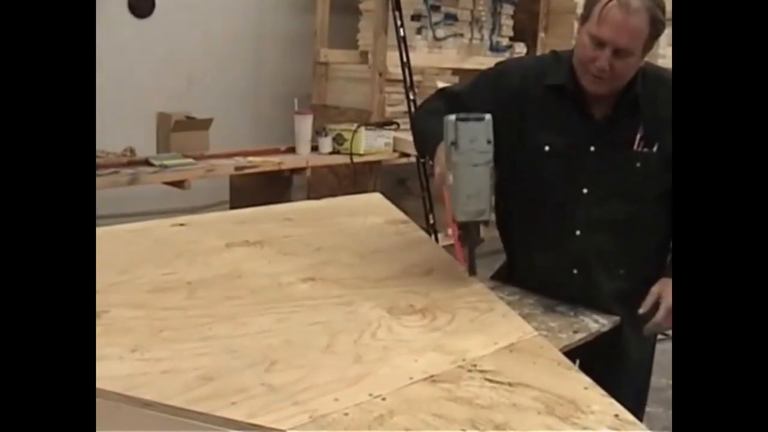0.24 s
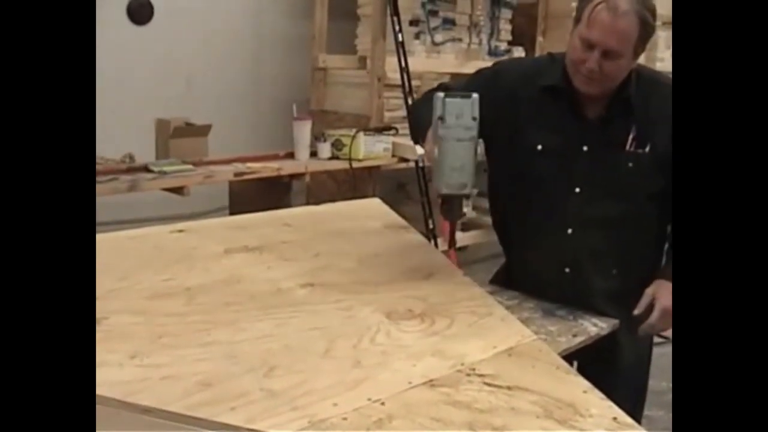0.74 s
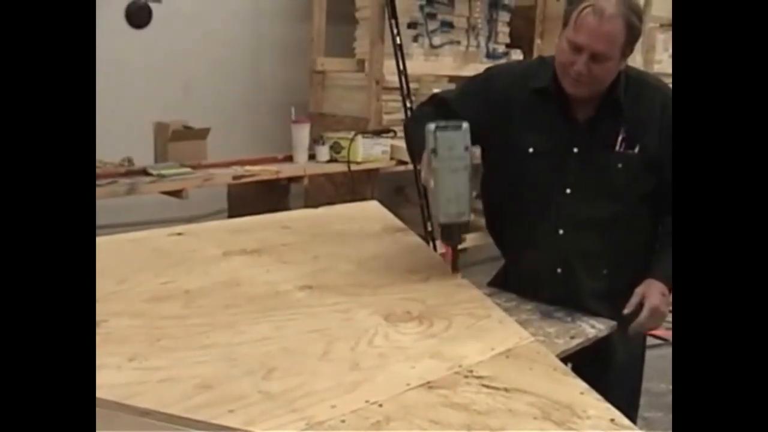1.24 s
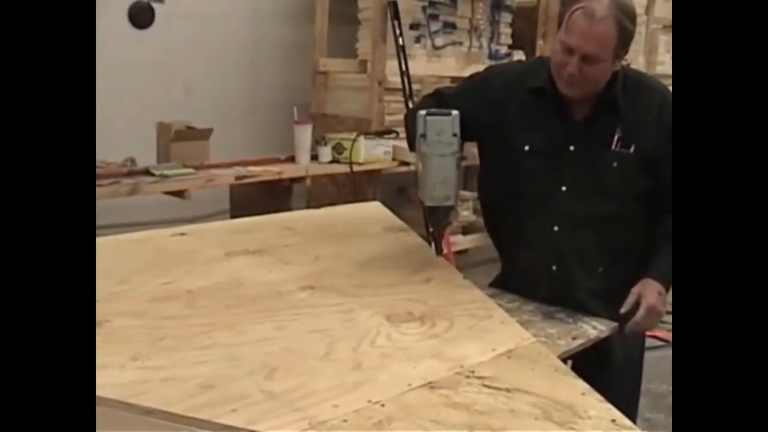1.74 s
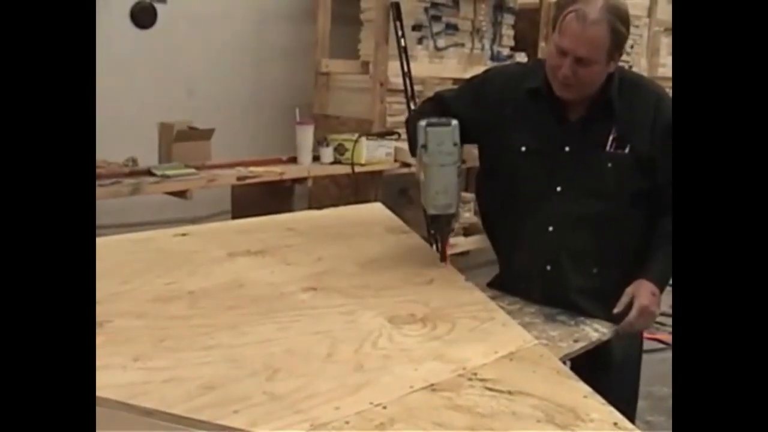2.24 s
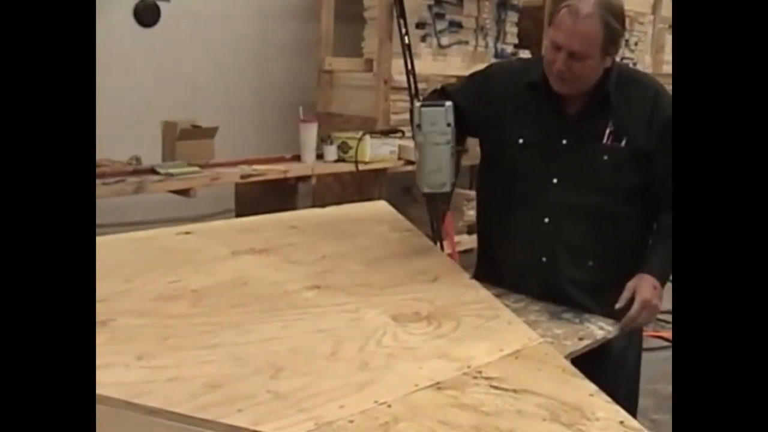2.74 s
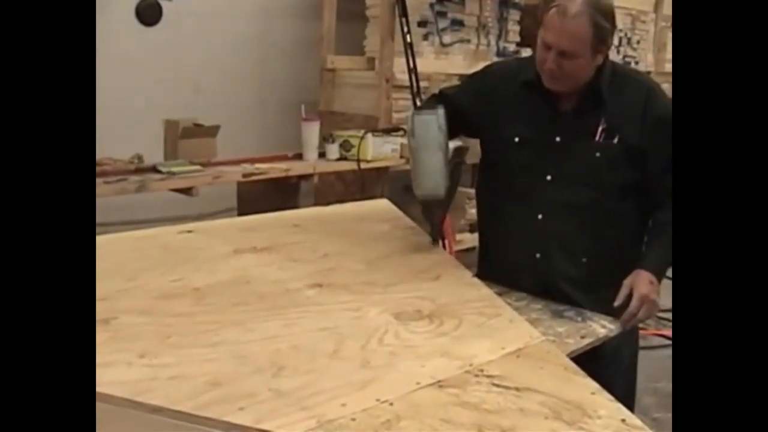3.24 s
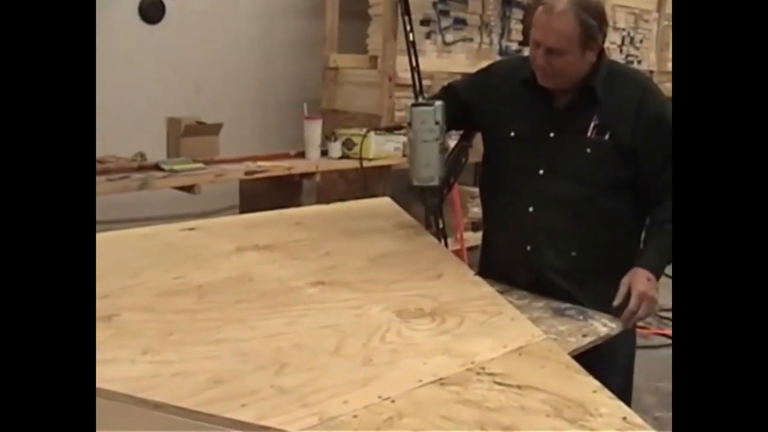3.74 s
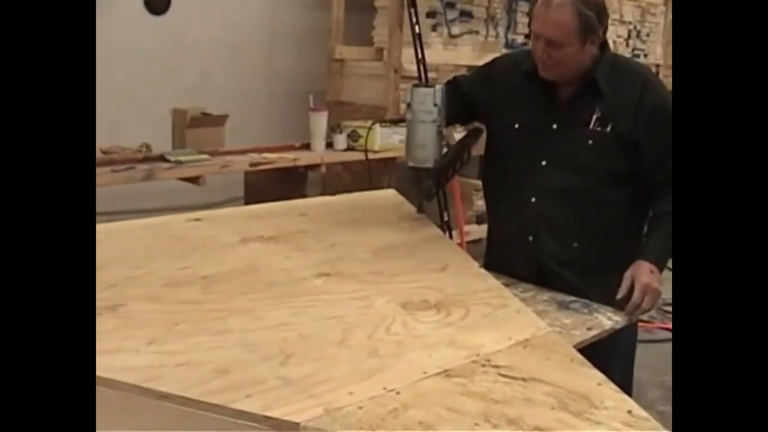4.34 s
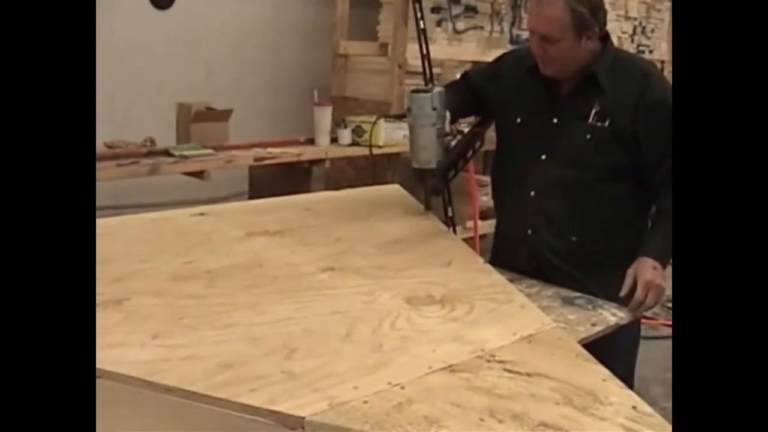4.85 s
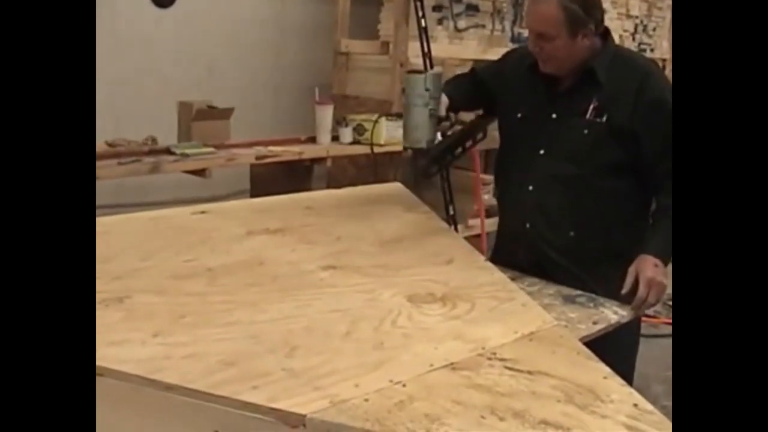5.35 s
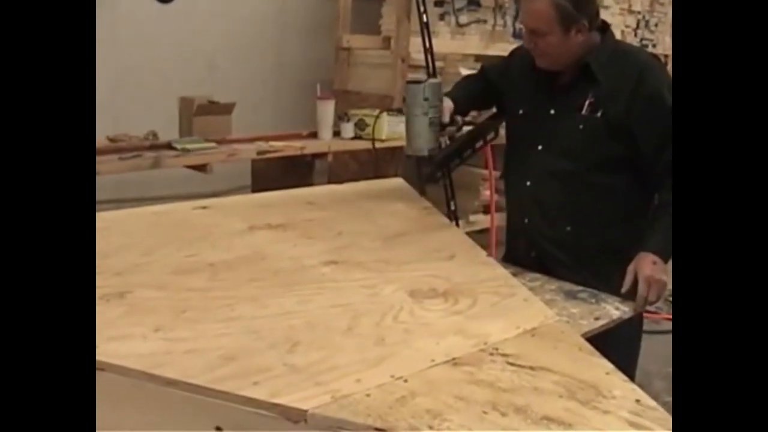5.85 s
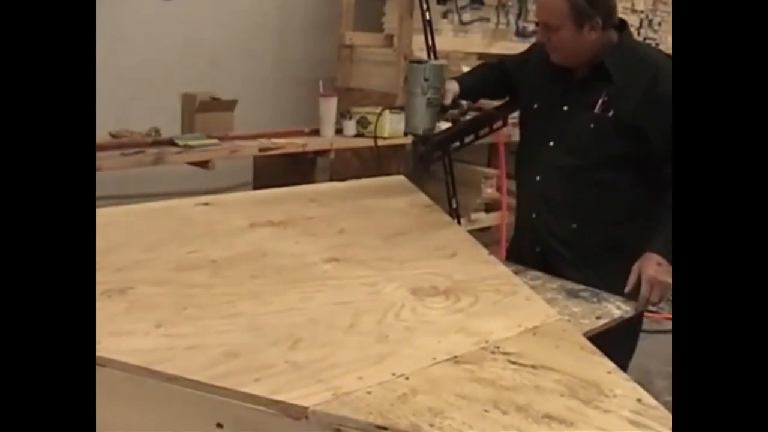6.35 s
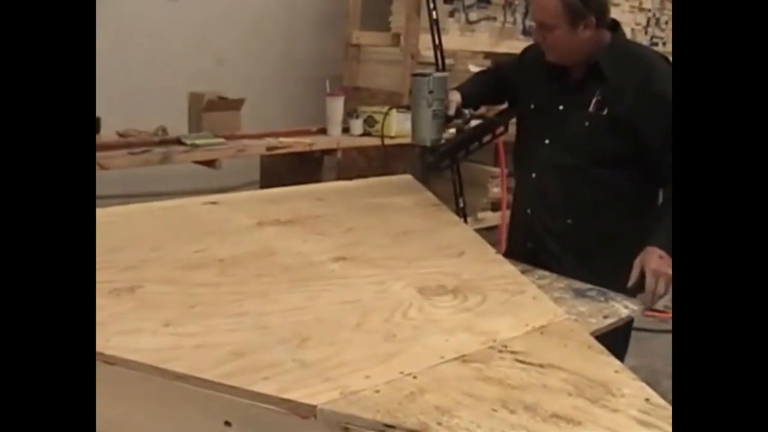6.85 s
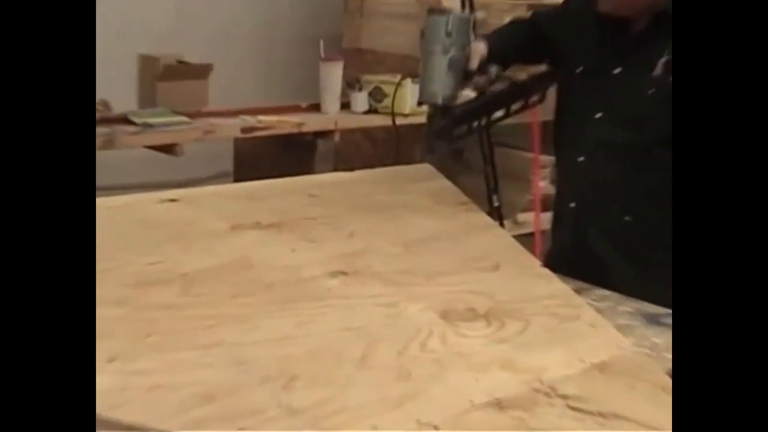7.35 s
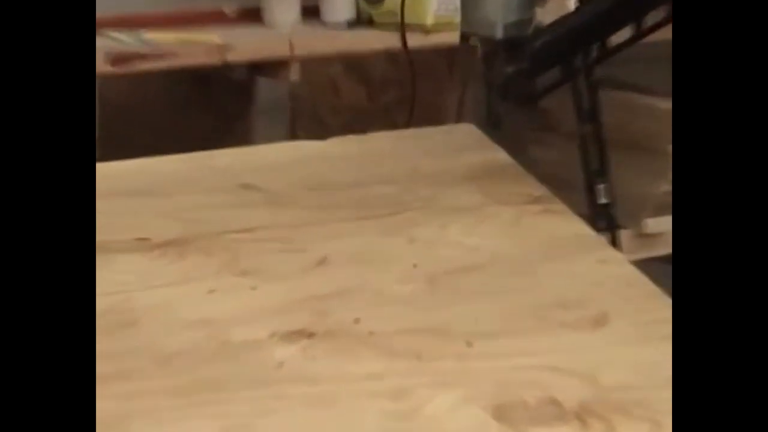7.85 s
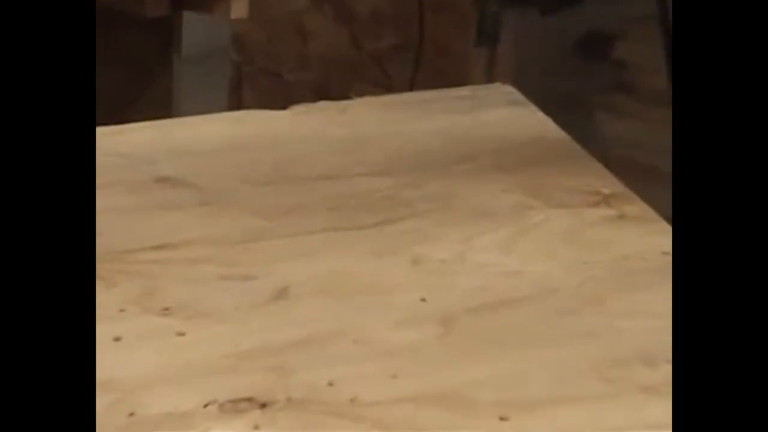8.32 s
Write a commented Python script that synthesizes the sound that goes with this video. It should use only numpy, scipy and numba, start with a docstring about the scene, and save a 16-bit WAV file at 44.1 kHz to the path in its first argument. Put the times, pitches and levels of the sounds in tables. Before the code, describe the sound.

In a large, reverberant workshop a pneumatic nailer is bumped along a plywood sheet, firing roughly once a second. Each shot is a light nose knock, then a hard snap and crack with a short steel ring, a fluttering burst of exhaust air and a long hall tail. A faint hose hiss fades underneath. Camera microphone a few metres away, its limiter flattening the bangs.

```python
"""Sharp double-edged bangs about once a second, each with a blast of air and a long ring in a live workshop.
A pneumatic nail gun is bump-fired along plywood: nose knock, valve snap, driver blow, chattering exhaust.
Shots are noise bursts, pulses and dying modes, heard direct and through a decaying-noise hall response.
Under them lie room tone, a leaking hose fitting and tape-drive whine; a tape camera's limiter flattens the bangs."""
import sys
import numpy as np
from scipy import signal
from scipy.fft import rfft, irfft
from scipy.io import wavfile
from numba import njit

SR = 44100
rng = np.random.default_rng(int(sys.argv[2]) if len(sys.argv) > 2 else 0)


def store_pcm(level_fs):
    """Save levels as 16-bit WAV."""
    pcm = np.round(np.clip(level_fs, -1, 1) * 32767).astype(np.int16)
    wavfile.write(sys.argv[1], SR, np.atleast_2d(pcm).T)


N = 378378

# sheet modes: (frequency [Hz], relative level [dB], t60 [s])
PLYWOOD_MODES = [(122.8, -3.5, 0.16), (211.2, -2.5, 0.23), (432.5, 3, 0.099), (600, -2, 0.055),
                 (754.3, 0, 0.3), (1178, -6.5, 0.18), (1370, 9, 0.013)]
# valve part modes: (frequency [Hz], relative level [dB], t60 [s])
VALVE_MODES = [(6950, -2, .016), (5300, 0, .016), (3000, -5, .012)]
BLOW_LAG_S, EXHAUST_LAG_S = .0078, .0245  # after the snap


def gain_of(db):
    """Decibels to amplitude."""
    return 10 ** (np.asarray(db) / 20)


def evened(x):
    """Scales to rms 1."""
    return x / np.sqrt(np.mean(x ** 2) + 1e-20)


def read(points, hz):
    """Reads a table on a log-frequency axis."""
    f, value = np.transpose(points)
    return np.interp(np.log(hz + 1), np.log(f + 1), value)


def add(mix, s, sound):
    """Mixes a sound in at s seconds."""
    part = mix[..., round(s * SR):][..., :sound.shape[-1]]
    part += sound[..., :part.shape[-1]]


def burst(spectrum, db, rise_s, t60_s, size=8192):
    """Coloured noise in two partly alike channels, with a quick rise and an exponential fall."""
    # next to the gun: (frequency [Hz], left-right likeness [0-1])
    near_likeness = [(100, 0.79), (1000, 0.94), (4000, 0.77), (8000, 0.68), (14000, 0.42)]
    t, hz = np.arange(size) / SR, np.fft.rfftfreq(size, 1 / SR)
    same = np.clip(read(near_likeness, hz), 0, 1)
    mid, side = rfft(rng.standard_normal((2, size))) * np.sqrt([1 + same, 1 - same])
    noise = irfft(np.array([mid + side, mid - side]) * gain_of(read(spectrum, hz)))
    return evened(noise) * gain_of(db - 60 * t / t60_s) * (1 - np.exp(-t / rise_s))


def ring(modes, size=8192):
    """Dying modes, each detuned a little at random."""
    t = np.arange(size) / SR
    return sum(gain_of(db - 60 * t / t60_s) * np.sin(2 * np.pi * hz * rng.uniform(0.98, 1.035) * t)
               for hz, db, t60_s in modes)


def click(spectrum, db, size=4096):
    """A causal (minimum-phase) pulse of the given colour, peak at db."""
    hz = abs(np.fft.fftfreq(size, 1 / SR))
    log_gain = np.log(gain_of(read(spectrum, hz)))
    min_phase = np.exp(np.conj(signal.hilbert(log_gain)))
    pulse = np.fft.ifft(min_phase).real[:size // 2]
    return gain_of(db) * pulse / abs(pulse).max()


def pair_noise(shape_db, hz):
    """Two partly alike channels of noise from a frequency by frame field of levels."""
    # in the room: (frequency [Hz], left-right likeness [0-1])
    room_likeness = [(30, 1), (120, 0.95), (300, 0.97), (700, 0.79), (1500, 0.53), (4000, 0.68), (9000, 1),
                     (14000, 0.92)]
    a, b, c, d = rng.standard_normal((shape_db.shape[1], len(hz), 4)).T
    same = np.clip(read(room_likeness, hz), 0, 1)[:, None]
    mid = np.sqrt(1 + same) * (a + 1j * b)
    side = np.sqrt(1 - same) * (c + 1j * d)
    spectra = np.array([mid + side, mid - side]) * gain_of(shape_db)
    size = 2 * len(hz) - 2
    return signal.istft(spectra, nperseg=size, noverlap=size * 3 // 4)[1]


def room_tone(hz, frames_s):
    """Room tone and microphone hiss: steady coloured noise."""
    # spectrum: (frequency [Hz], relative level [dB])
    floor_spectrum = [(15, -30), (50, 1), (110, -20), (234, -11), (331, -18), (443, -12), (1190, -5),
                      (2860, -1), (5860, -9.5), (6700, -9), (8070, -9.5), (14500, -23)]
    floor_db = -53
    shape_db = read(floor_spectrum, hz)[:, None] + 0 * frames_s
    return gain_of(floor_db) * evened(pair_noise(shape_db, hz)[:, :N])


def hose_leak(hz, frames_s):
    """Air leaks past a hose fitting: a drifting narrow whistle over a wide hiss."""
    # level and pitch over time: (time [s], level [dB], whistle centre [Hz])
    leak_course = [(0, -46, 6200), (1.4, -49, 6270), (1.9, -49, 6440), (2.45, -50.5, 6200),
                   (3.2, -55, 6270), (6, -60.5, 5983), (8.6, -73, 5944)]
    whistle_width_hz, broad_db = 1100, -9.5
    s, leak_db, leak_hz = np.transpose(leak_course)
    centre_hz = np.interp(frames_s, s, leak_hz)
    whistle = 1 / (1 + (2 * (hz[:, None] - centre_hz) / whistle_width_hz) ** 2)
    broad = gain_of(broad_db) * np.exp(-(np.log(hz[:, None] / 7000 + 1e-9) / 0.95) ** 2)
    leak = evened(pair_noise(20 * np.log10(whistle + broad), hz)[:, :N])
    return gain_of(np.interp(np.arange(N) / SR, s, leak_db)) * leak


def tape_whine():
    """Tape drive: steady high harmonics of one rate."""
    # partials: (multiple of whine_hz, level [dB rms])
    whine_partials = [(25, -71), (26, -71), (27, -72), (28, -88)]
    whine_hz = 299.7
    t = np.arange(N) / SR
    return sum(np.sqrt(2) * gain_of(db) * np.sin(2 * np.pi * (k * whine_hz * t + rng.random()))
               for k, db in whine_partials)


def background():
    """Room tone and microphone hiss, a leaking hose fitting and the whine of the tape drive."""
    hz, frames_s = np.fft.rfftfreq(1024, 1 / SR), np.arange(N // 256 + 5) * 256 / SR
    return room_tone(hz, frames_s) + hose_leak(hz, frames_s) + tape_whine()


def hall(gap_s=0.00071, build_s=0.024):
    """Echo pattern of the workshop from one spot: builds up, then each band dies at its own speed."""
    # decay: (frequency [Hz], t60 [s])
    hall_t60 = [(60, 1.7), (150, 1.12), (400, 1.577), (1000, 1.556), (2000, 1.297), (4000, 0.93),
                (8000, 0.64), (14000, 0.85)]
    # colour: (frequency [Hz], relative level [dB])
    hall_colour = [(30, -2), (85, 2.5), (120, 14), (300, 8.5), (800, 5), (1900, 3.5), (2600, 3.5),
                   (6000, -5), (9000, -11.5), (15000, -4)]
    bass_build_s, bass_build_hz = 0.044, 900  # the low boom gathers more slowly
    hz, t = np.fft.rfftfreq(512, 1 / SR), np.arange(540) * 128 / SR
    build_speed = (1 + (hz[:, None] / bass_build_hz) ** 2) / bass_build_s
    gathering = 1 - np.exp(-(t + 0.0035) * build_speed)
    decay_db = read(hall_colour, hz)[:, None] - 60 * t / read(hall_t60, hz)[:, None]
    tail = pair_noise(decay_db + 20 * np.log10(gathering), hz)
    t = np.arange(tail.shape[1]) / SR
    tail = tail * (1 - np.exp(-np.maximum(t - gap_s, 0) / build_s))
    return tail / np.sqrt((tail ** 2).sum(1).mean())  # unit energy


def steel(ring_hz):
    """Modes of the steel driver."""
    # (multiple of ring_hz, relative level [dB], t60 [s])
    steel_modes = [(1, 1.5, 0.032), (1.13, -6, 0.036), (.52, -5, 0.023)]
    return ring([(ring_hz * k, db, t60_s) for k, db, t60_s in steel_modes])


def bump(knock_db, rise_s, hiss_db, ring_hz):
    """The nose knocks the sheet and settles; air hisses briefly past the trip valve as it opens and shuts."""
    # knock: (frequency [Hz], relative level [dB])
    knock_spectrum = [(35, -36), (60, -12.5), (1110, -1), (2510, -4.5), (3580, -18), (5790, -11),
                      (6710, -47), (9000, -12), (11700, -56), (19800, -120)]
    # valve hiss: (frequency [Hz], relative level [dB])
    trip_spectrum = [(1500, -36), (4000, -4), (5600, 4.5), (7000, 2.5), (9500, -5.5), (15000, -11)]
    sheet_db, steel_db = -5, -5  # relative to knock_db
    seat_s = .009  # the nose piece bottoms out; driver and valve parts ring
    trip_open_s, trip_shut_s = .009, .044
    t = np.arange(8192) / SR
    sheet = gain_of(knock_db + sheet_db) * ring(PLYWOOD_MODES) * (1 - np.exp(-t / rise_s))
    knock = sheet + burst(knock_spectrum, knock_db, rise_s, 0.15)
    add(knock, seat_s, gain_of(knock_db + steel_db) * (steel(ring_hz) + ring(VALVE_MODES)))
    opening = (1 - np.exp(-(t / trip_open_s) ** 3)) * np.exp(-(t / trip_shut_s) ** 6)
    return knock + burst(trip_spectrum, hiss_db, 0.0038, 1.0) * opening


def snap_and_exhaust(snap_db, exhaust_db, click_db=8, rattle_db=-3, hiss_db=-2):
    """The valve snaps; later the exhaust valve chatters, so air leaves in puffs over a longer hiss."""
    # valve snap: (frequency [Hz], relative level [dB])
    snap_spectrum = [(150, -17.5), (600, -1.5), (2500, -12.5), (4300, 5.5), (5300, -0.5), (7200, -10),
                     (9000, -15), (16000, -19)]
    # exhaust air: (frequency [Hz], relative level [dB])
    exhaust_spectrum = [(600, -8), (1500, -27.5), (3600, -1), (5000, -1), (6500, 4), (8200, 3.5),
                        (9800, -5), (11800, -6.5), (13800, -16.5), (16000, -27)]
    puff_count, puff_gap_s, puff_jitter_s = 5, .0095, .001
    puff_db, puff_step_db, puff_spread_db = 9, -1.58, 1.8  # first over exhaust_db, step per puff, random
    out = np.zeros((2, 20000))
    add(out, 0, click(snap_spectrum, snap_db + click_db))
    add(out, 0, burst(snap_spectrum, snap_db + rattle_db, .0002, .016))
    add(out, 0, gain_of(snap_db) * ring(VALVE_MODES))
    for k, (late, louder) in enumerate(rng.standard_normal((puff_count, 2))):
        db = exhaust_db + puff_db + puff_step_db * k + puff_spread_db * louder
        at_s = EXHAUST_LAG_S + puff_gap_s * k + puff_jitter_s * late
        add(out, at_s, burst(exhaust_spectrum, db, 0.0019, t60_s=0.032))
    add(out, EXHAUST_LAG_S, burst(exhaust_spectrum, exhaust_db + hiss_db, 0.0053, 0.28, size=16384))
    return out


def blow(db, ring_hz, steel_rise_s=0.00019):
    """Heard from near: the nail cracks into the wood while the steel driver rings."""
    # crack: (frequency [Hz], relative level [dB])
    crack_spectrum = [(70, -12), (200, 4), (500, 4.5), (2300, -0.5), (3300, -5), (6700, -3.5), (9000, -12),
                      (12000, -12), (16000, -24)]
    t = np.arange(8192) / SR
    driver = gain_of(db) * steel(ring_hz) * (1 - np.exp(-t / steel_rise_s))
    return driver + burst(crack_spectrum, db, rise_s=0.0014, t60_s=0.28)


def thump(db, ring_hz):
    """The whole frame thumps into the hall and the sheet rings; the colour shifts with the driver's ring."""
    # (frequency at usual_ring_hz [Hz], relative level [dB])
    thump_spectrum = [(25, 16.5), (70, -32.5), (120, -3), (400, 2), (900, 6.5), (2050, 4.5), (2350, -1.5),
                      (4000, -3), (7500, -3.5), (10000, -47), (16000, -31)]
    usual_ring_hz, sheet_db = 2000, -42
    out = gain_of(db + sheet_db) * ring(PLYWOOD_MODES)
    add(out, 0, click([(hz * ring_hz / usual_ring_hz, level_db) for hz, level_db in thump_spectrum], db))
    return out


def nailing(hall_db=4, small_db=-1):
    """Every shot, direct and through the hall from its own spot."""
    # shots: (valve snap time [s], snap level [dB], driver blow level [dB], driver ring [Hz],
    #         level of the thump into the hall before hall_db [dB])
    shots = [(-.33, -20, -3, 1987, 16), (0.5079, -7.5, -5, 1980, 13.5), (1.4714, -6, -4.5, 1890, 14),
             (2.4917, -13, -7.5, 2040, 13.5), (3.3803, -13, -2, 2050, 13), (4.3505, -12.5, -3, 1940, 10.5),
             (5.2326, -16, -3.5, 2140, 12), (6.1413, -13.5, -2.5, 1853, 11.5),
             (7.301, -15, -5.5, 1920, 8.5), (8.2401, -8, -7.5, 1900, 8)]
    # nose landings: (time [s], knock level [dB], knock rise [s])
    bumps = [(.48, -14.5, 0.0033), (1.446, -16, 0.0006), (2.463, -20, 0.0035), (3.352, -19.5, 0.0015),
             (4.32, -22.5, 0.0024), (5.203, -22, 0.00034), (6.114, -21, 0.0096), (7.269, -19, 0.014),
             (8.212, -21.5, 0.0011)]
    # the air fades as the gun works away along the edge; levels are at 0 s
    exhaust_db, exhaust_db_per_s = -7.5, -0.63
    trip_db, trip_db_per_s = -20, -1.13
    lead = SR  # samples before the start, so that an earlier shot still rings
    pan_db = .6  # left over right
    mix = np.zeros((2, N + lead))
    for s, snap_db, blow_db, ring_hz, thump_db in shots:
        start = s - .06  # room for the nose landing
        blow_s = s - start + BLOW_LAG_S
        gun = np.zeros((2, 22000))
        add(gun, s - start, snap_and_exhaust(snap_db, exhaust_db + exhaust_db_per_s * s))
        for at, knock_db, rise_s in bumps:
            if start < at < s:
                add(gun, at - start, bump(knock_db, rise_s, trip_db + trip_db_per_s * at, ring_hz))
        far = gain_of(small_db) * gun
        add(far, blow_s, thump(thump_db, ring_hz))
        heard = gain_of(hall_db) * signal.fftconvolve(far, hall(), axes=1)
        add(heard, 0, gun)
        add(heard, blow_s, blow(blow_db, ring_hz))
        add(mix, start + lead / SR, heard)
    return mix[:, lead:] * gain_of([[pan_db / 2], [-pan_db / 2]])


def scene():
    """Nail gun in the hall over the background."""
    return background() + nailing()


@njit
def follow(level_db, attack, release):
    """Level follower: one-pole smoothing with separate shares per sample for rise and fall."""
    out, held = np.empty(len(level_db)), level_db[:2000].max()
    for n in range(len(level_db)):
        held += (attack if level_db[n] > held else release) * (level_db[n] - held)
        out[n] = held
    return out


def record(dry):
    """Bass roll-off, a limiter above a threshold, soft uneven overload, a steep low-pass at edge_hz."""
    # squared part of the overload, adds a low jolt on loud moments: rows left, right (share)
    lopsided = [
        [.09],
        [.14],
    ]
    bass_hz, edge_hz = 80, 16100
    limit_db, share = -14, 0.67  # share of the excess dB taken off
    attack_s, release_s = 0.008, 0.0097
    ceiling = .88
    dry = signal.lfilter(*signal.butter(2, bass_hz, "high", fs=SR), dry)
    power = signal.lfilter([.02], [1, -.98], (dry ** 2).mean(0))
    over_db = np.maximum(10 * np.log10(power + 1e-12) - limit_db, 0)
    held_db = follow(over_db, 1 / (attack_s * SR), 1 / (release_s * SR))
    ducked = dry / gain_of(share * held_db)
    limited = ceiling * np.tanh(ducked / ceiling)
    uneven = limited - lopsided * limited ** 2
    uneven = signal.lfilter(*signal.butter(1, 15, "high", fs=SR), uneven)
    low_pass = signal.firwin(1023, edge_hz, window=("kaiser", 11), fs=SR)
    return signal.oaconvolve(uneven, low_pass[None], "same")


dry = scene()
out = record(dry)
store_pcm(out)
```